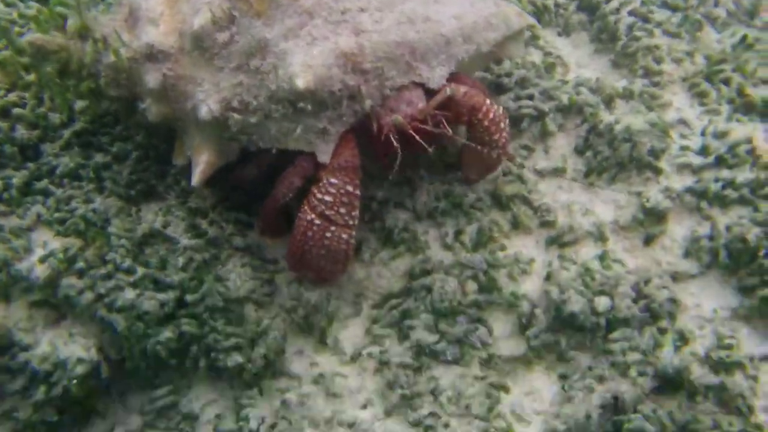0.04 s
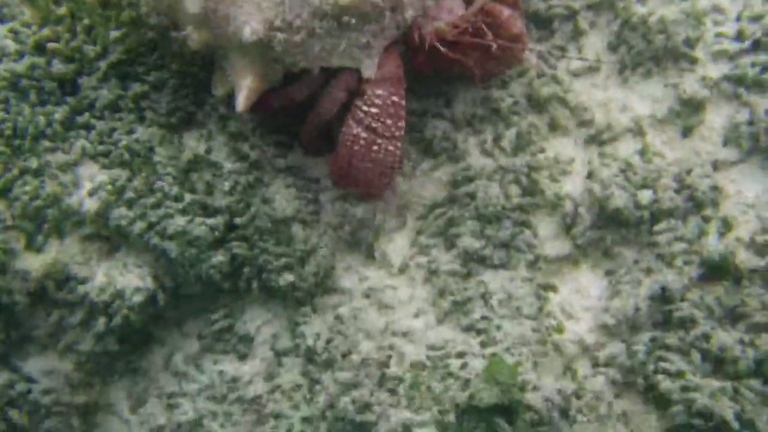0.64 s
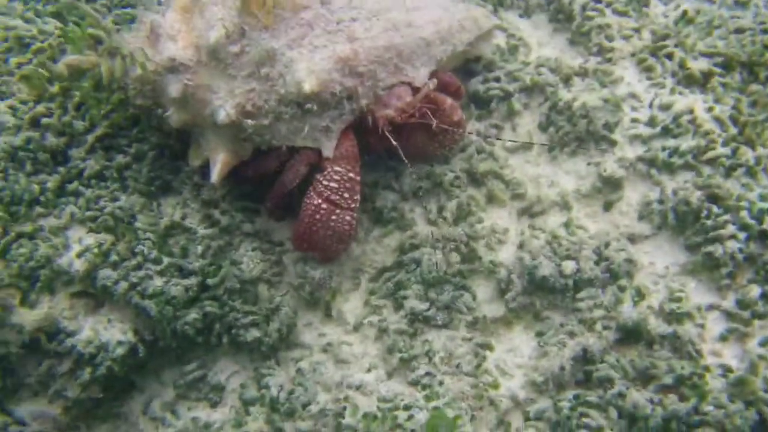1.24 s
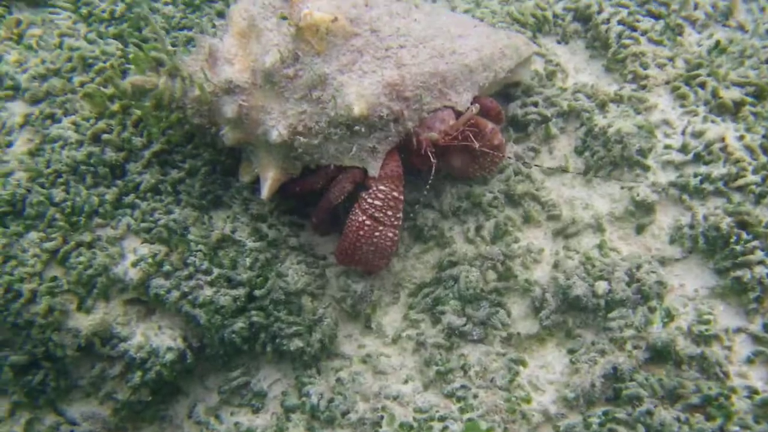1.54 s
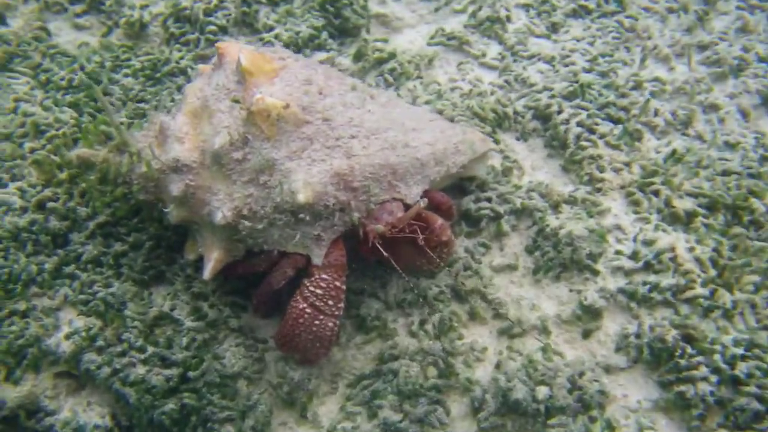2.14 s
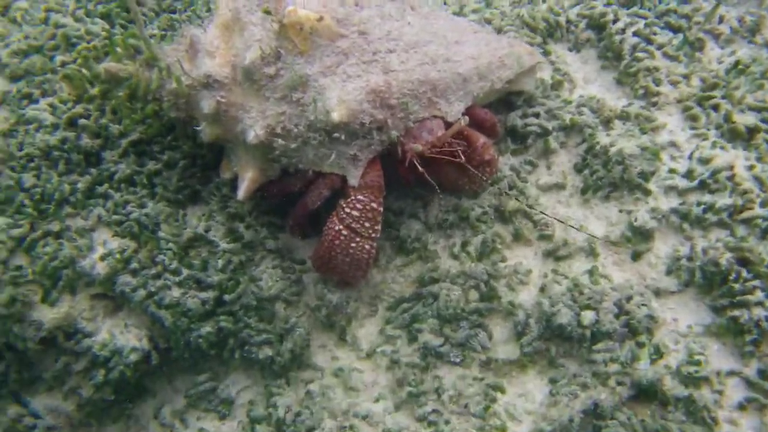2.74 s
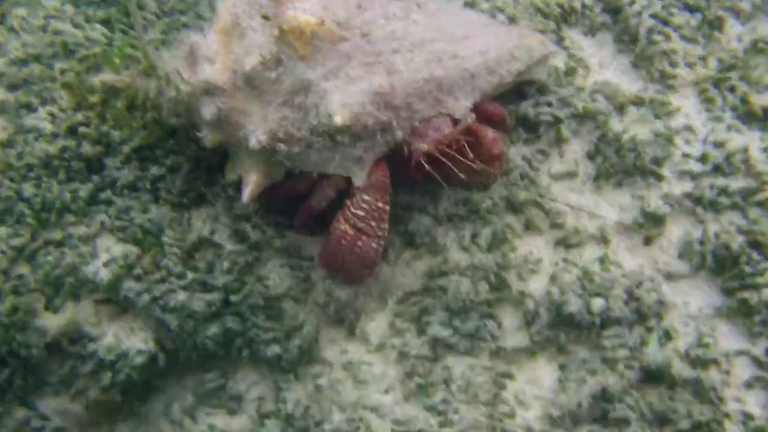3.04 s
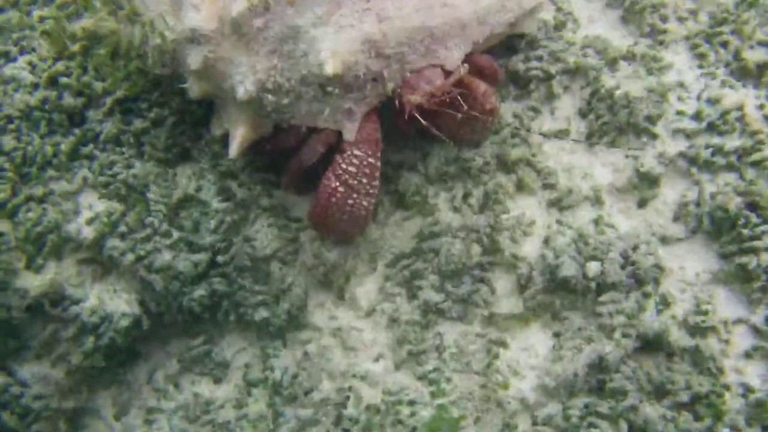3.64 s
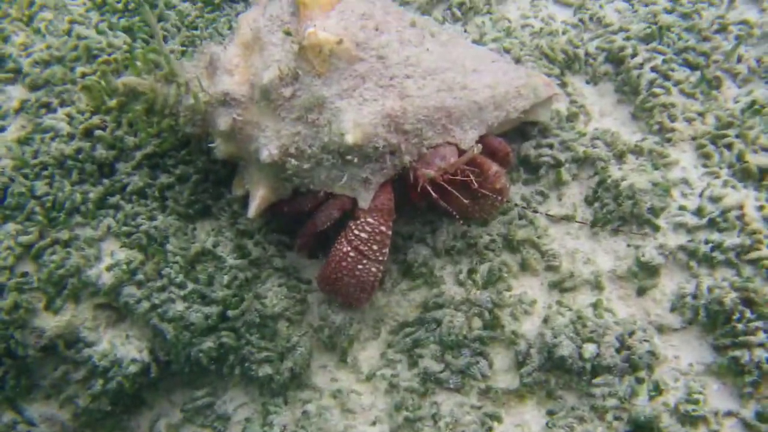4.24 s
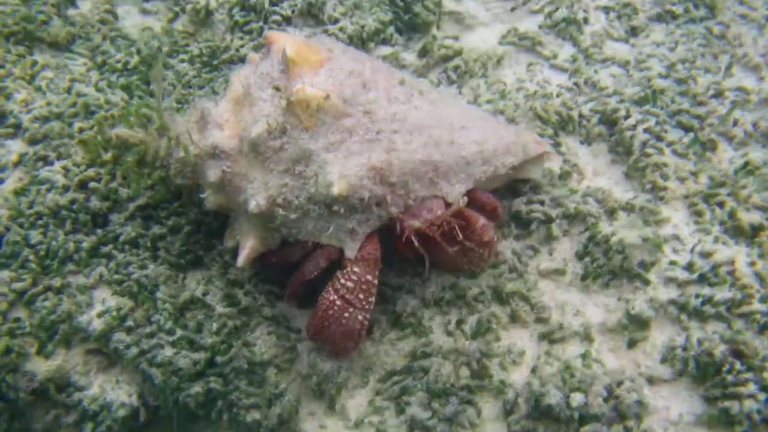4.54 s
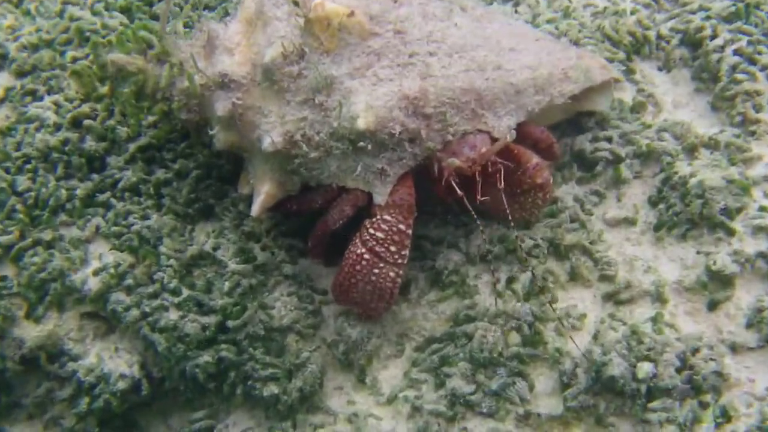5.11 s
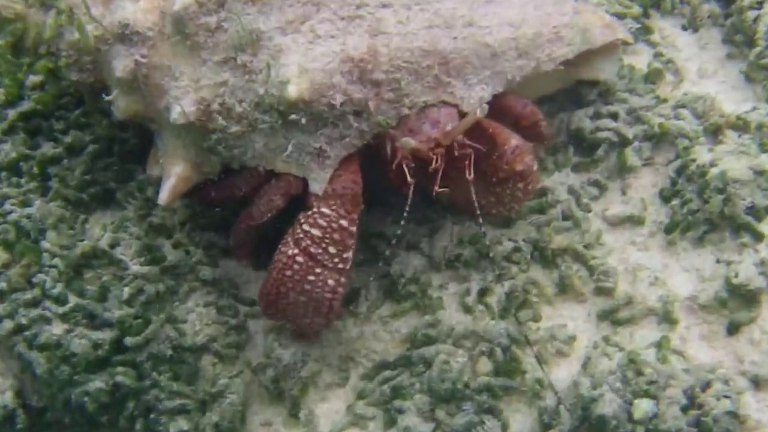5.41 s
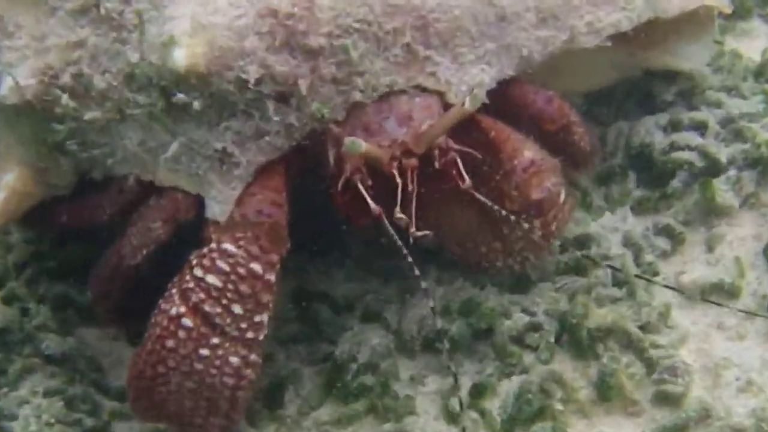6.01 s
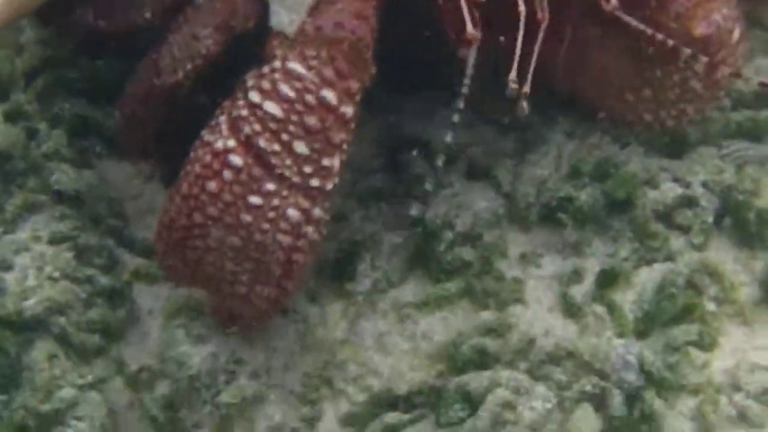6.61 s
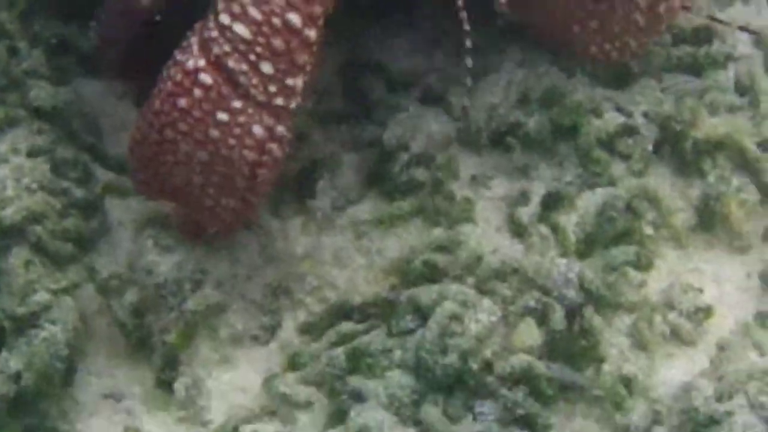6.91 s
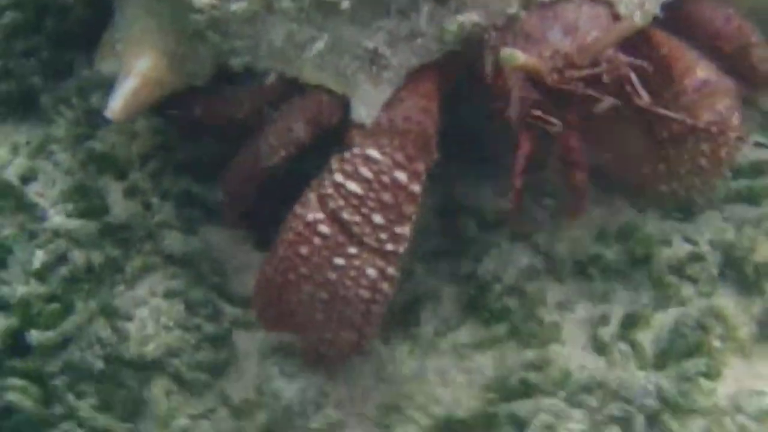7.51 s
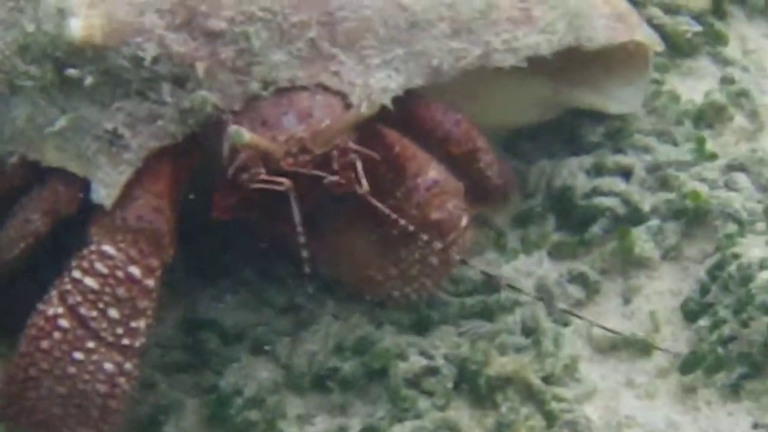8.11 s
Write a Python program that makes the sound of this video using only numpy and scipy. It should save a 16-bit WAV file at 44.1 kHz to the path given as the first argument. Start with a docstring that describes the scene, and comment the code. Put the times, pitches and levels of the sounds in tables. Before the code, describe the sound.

Close thuds, clicks and rubbing on a submerged camera housing, over low water rumble, bubbles and a faint crackle of snapping shrimp.

```python
"""Knocks, clicks and rubbing of a hand on a waterproof camera case, heard from the microphone inside it.
Blows thud and ring the case's cavity and walls; the skin sticks and slips on its shell.
The case is held close over a shallow seabed: water rumbles and washes round it, bubbles gurgle past,
and snapping shrimp crackle near and far over a faint hiss.
Each hard knock ducks the recorder's gain, which then creeps back."""
import sys
import numpy as np
from scipy import signal
from scipy.fft import rfft, irfft, next_fast_len
from scipy.io import wavfile

SR = 44100
rng = np.random.default_rng(int(sys.argv[2]) if len(sys.argv) > 2 else 0)


def transcribe(u):
    """Save the signal u as a 16-bit wav file named by the first command-line argument.

    u: samples, shape (n,) or (channels, n), limited to [-1, 1]; the rate is SR.
    q: integer samples, one column per channel.
    """
    v = np.clip(np.atleast_2d(u).T, -1, 1)
    q = np.round(v * 32767).astype(np.int16)
    wavfile.write(sys.argv[1], SR, q)


N = 368676
TIME = np.arange(N) / SR


def gain_of(db):
    return 10 ** (np.asarray(db) / 20)


def unit_rms(x):
    return x / np.sqrt(np.mean(x ** 2) + 1e-20)


def unit_burst(x):
    """x with the energy of 10 ms at level 1."""
    return x / np.linalg.norm(x) * np.sqrt(SR / 100)


def add(mix, start_s, sound):
    part = mix[max(round(start_s * SR), 0):][:len(sound)]
    part += sound[:len(part)]


def follow(curve):
    """Gain over time from rows of (time [s], level [dB])."""
    return gain_of(np.interp(TIME, *np.transpose(curve)))


def coloured(x, spectrum):
    """x filtered by the given spectrum, at unit level."""
    hz, db = np.transpose(spectrum)
    size = next_fast_len(N)
    shape_db = np.interp(np.log(np.fft.rfftfreq(size, 1 / SR) + 1), np.log(hz), db)
    return unit_rms(irfft(rfft(x, size) * gain_of(shape_db), size)[:N])


def drift(per_s):
    """A random wander of unit size that turns so many times a second."""
    knots = rng.standard_normal(N // 20)
    return unit_rms(np.interp(TIME * per_s, np.arange(len(knots)), knots))


def grains(per_s, spread_db):
    """A random train of impulses, most small and a few large."""
    where, size, side = rng.random((int(per_s * N / SR), 3)).T
    sizes = gain_of(spread_db * np.minimum(-np.log(1 - size), 5))
    return np.bincount((where * N).astype(int), sizes * np.sign(side - .5), N)


def scatter(sound, per_s, spread_db):
    """One sound repeated at random moments and strengths."""
    out, train = np.zeros(N), grains(per_s, spread_db)
    for at in np.flatnonzero(train):
        add(out, at / SR, train[at] * sound)
    return out


def ring(modes, t):
    """Decaying modes struck at t = 0."""
    return sum(gain_of(db - 60 * t / t60) * np.sin(2 * np.pi * hz * t) for hz, db, t60 in modes)


def press(start_s, length_s, build_share=0.26, release_share=0.4):
    """Gain over time of one push of the hand that builds, holds and lets go."""
    corners = start_s + length_s * np.array([0, build_share, 1 - release_share, 1])
    return np.interp(TIME, corners, [0, 1, 1, 0])


# noise floor at the microphone: (frequency [Hz], relative level [dB])
HISS_SPECTRUM = [(100, -1), (1500, 6.5), (3800, 1), (4500, 0), (5200, 3.5), (5900, 0.5), (6600, 2),
                 (7600, -1.5), (11500, -1), (14500, -1), (15600, -10.5), (16200, -25)]


def hiss(hiss_db=-57):
    """The steady noise of the microphone and of the far reef."""
    return gain_of(hiss_db) * coloured(rng.standard_normal(N), HISS_SPECTRUM)


def shrimp(count=14, snaps_per_s=48, faintest_db=-60, spread_db=3.5, tick_db=-11):
    """Distant shrimp all around, each ringing the case with a snap of its own colour."""
    out = np.zeros(N)
    for centre_hz in np.geomspace(2600, 6500, count):
        snap = click(centre_hz, octaves=.7)
        add(snap, 0, gain_of(tick_db) * tick())
        out += scatter(snap, snaps_per_s / count, spread_db)
    return gain_of(faintest_db) * out


# slow pressure of the water over the seabed: (time [s], relative level [dB])
RUMBLE_LEVELS = [(0, -43.5), (1.0, -33.5), (1.45, -39.5), (1.85, -32.5), (2.2, -47), (3.15, -27),
                 (4.15, -37.5), (4.8, -31), (6.2, -37), (7.3, -32.5), (8.36, -31)]
# its spectrum at the microphone: (frequency [Hz], relative level [dB])
RUMBLE_SPECTRUM = [(8, -21), (22, 6.5), (45, 0.5), (90, -3), (140, -8), (220, -13), (400, -30), (1000, -70)]


def rumble(rumble_db=-3):
    """Deep pressure swings of the moving water."""
    swings = coloured(rng.standard_normal(N), RUMBLE_SPECTRUM)
    return gain_of(rumble_db) * swings * follow(RUMBLE_LEVELS)


# current round the case, swelling every second or two: (time [s], relative level [dB])
CURRENT_LEVELS = [(0, -41.5), (0.35, -48.5), (1.6, -42), (2.15, -35), (2.92, -33), (3.2, -17.5),
                  (3.75, -25), (4.6, -34.5), (4.95, -27.5), (5.7, -26.5), (6.08, -52.5), (6.5, -25.5),
                  (7.2, -29), (7.65, -43.5), (8.0, -33.5), (8.36, -32.5)]
# shoves of the hand on the case: (start [s], length [s], rub [dB], judder [dB], slosh [dB])
SHOVES = [(0.476, 0.13, -38, -44.5, -29.5), (0.585, 0.28, -39, -40.5, -30), (0.735, 0.15, -32, -27, -23.5),
          (0.838, 0.17, -49, -50, -29), (0.967, 0.047, -26.5, -25, -40), (0.99, 0.1, -39, -42, -29.5),
          (1.261, 0.16, -38.5, -45, -36.5), (1.632, 0.078, -31.5, -34.5, -27.5),
          (1.692, 0.12, -32, -59, -39), (1.802, 0.11, -30, -26.5, -21.5), (1.866, 0.1, -37.5, -31.5, -32),
          (2.01, 0.18, -38.5, -39.5, -40), (2.192, 0.11, -39.5, -46, -41), (2.312, 0.22, -39, -39, -44),
          (2.481, 0.048, -42, -29, -30.5), (2.525, 0.29, -37, -38.5, -35.5),
          (2.951, 0.037, -29.5, -27.5, -43), (3.002, 0.17, -27, -27, -12.5), (3.162, 0.13, -25, -27.5, -22),
          (7.09, 0.11, -45, -52, -26), (7.457, 0.09, -43, -48, -35.5)]


def motion(rest_rub_db=-53.5, pull_rub_db=-21.5):
    """Gains over time of rubbing, judder and flow: the current and each shove add their power."""
    current = follow(CURRENT_LEVELS)
    # the hand rubs faintly at rest, and more as the current pulls on the case
    rub_power = gain_of(rest_rub_db) ** 2 + (gain_of(pull_rub_db) * current) ** 2
    judder_power, flow_power = np.zeros(N), current ** 2
    for start_s, length_s, rub_db, judder_db, slosh_db in SHOVES:
        power = press(start_s, length_s) ** 2
        rub_power += power * gain_of(rub_db) ** 2
        judder_power += power * gain_of(judder_db) ** 2
        flow_power += power * gain_of(slosh_db) ** 2
    return np.sqrt(rub_power), np.sqrt(judder_power), np.sqrt(flow_power)


# the wash, heard from inside the case: (frequency [Hz], relative level [dB])
WASH_SPECTRUM = [(60, -45.5), (150, -15), (210, -7.5), (265, -6.5), (305, -3.5), (350, 2), (420, -6.5),
                 (500, -13.5), (570, -20.5), (650, -11), (760, -34.5), (1000, -39.5), (1450, -45),
                 (1690, -31.5), (1950, -49.5), (2900, -62), (3190, -45), (3500, -65.5)]


def wash(flow, wash_db=-3, eddy_db=2):
    """Eddies drum on the case near its cavity note."""
    eddies = grains(per_s=1500, spread_db=3.06) * gain_of(eddy_db * drift(per_s=35))
    return gain_of(wash_db) * coloured(eddies, WASH_SPECTRUM) * flow


def burble(flow, count=14, low_hz=230, high_hz=680, per_s=40, cycles=9, glide=0.028, burble_db=-9):
    """Small bubbles carried in the wash, each a short rising note; the high ones are weaker."""
    out, t = np.zeros(N), np.arange(SR // 8) / SR
    for hz in np.geomspace(low_hz, high_hz, count):
        age = hz * t / cycles
        note = np.sin(2 * np.pi * hz * t * (1 + glide * age)) * age * np.exp(-2 * age)
        tilt_db = -9 * np.log2(hz / low_hz)
        out += scatter(gain_of(tilt_db) * note, per_s / count, spread_db=2.0)
    return gain_of(burble_db) * unit_rms(out) * flow


# large bubbles slipping past the case:
# (start [s], length [s], first pitch [Hz], last pitch [Hz], level [dB], swell [share of length])
LARGE_BUBBLES = [(2.297, 0.15, 276.4, 283, -28, 0.23), (2.422, 0.068, 290, 312, -25, .7),
                 (2.561, 0.059, 349, 380, -18, 0.32), (2.598, 0.093, 383, 350, -18, 0.28),
                 (3.031, 0.082, 328.6, 464, 4, 0.24), (3.036, 0.13, 205.4, 107, 6, 0.094),
                 (3.125, 0.055, 291, 209, -1, 0.63), (3.225, 0.065, 369, 283, -13.5, 0.47),
                 (5.81, 0.1, 343, 271, -28.5, 0.3), (5.921, 0.11, 643, 640, -42.5, 0.19),
                 (6.211, 0.048, 665, 616, -37.5, 0.37)]


def gurgles(wobble_db=1, jitter=0.051, glide_power=2.05, fade_power=1.66):
    """Each bubble swells and dies away as one wobbling tone whose glide gathers speed."""
    out, wobble = np.zeros(N), gain_of(wobble_db * drift(per_s=121.04))
    for start_s, length_s, first_hz, last_hz, db, swell in LARGE_BUBBLES:
        age = np.linspace(0, 1, int(length_s * SR))
        shape_change = np.interp(age, np.linspace(0, 1, 24), rng.standard_normal(24))
        hz = (first_hz + (last_hz - first_hz) * age ** glide_power) * (1 + jitter * shape_change)
        envelope = np.minimum(age / swell, ((1 - age) / (1 - swell)) ** fade_power)
        add(out, start_s, gain_of(db) * envelope * np.sin(2 * np.pi * np.cumsum(hz) / SR))
    return out * wobble


# the case shuddering round the microphone: (frequency [Hz], relative level [dB])
DRONE_SPECTRUM = [(40, -29), (70, -1.5), (95, -2), (120, -4), (160, -35), (400, -57.5)]


def drone(start_s=7.88, length_s=0.51, drone_db=-29):
    """A narrow, low shudder of the case as the hand tightens."""
    shudder = coloured(rng.standard_normal(N), DRONE_SPECTRUM)
    return gain_of(drone_db) * shudder * press(start_s, length_s)


# skin dragging on the case, heard from inside: (frequency [Hz], relative level [dB])
DRAG_SPECTRUM = [(40, -6.5), (110, -1), (220, -5), (360, 0.5), (480, -3), (680, 1), (950, -16),
                 (1300, -30.5), (4000, -57)]


def drags(judder):
    """Under pressure the skin sticks and slips slowly enough to judder the whole case."""
    return judder * coloured(grains(per_s=700, spread_db=0.84), DRAG_SPECTRUM)


# the grip rubbing right by the microphone: (frequency [Hz], relative level [dB])
RUB_SPECTRUM = [(200, -17), (500, 11), (800, 6.5), (1200, 1.5), (1700, 5), (2050, 3.5), (2450, -0.5),
                (2850, -6), (3250, -11.5), (4000, -20.5), (5200, -11), (6200, -36), (9000, -47.5),
                (16000, -44)]


def grip(rub, rub_db=-3, catch_db=2.0, grit_db=-14, grit_top_hz=3800):
    """Thousands of tiny slips a second, catching unevenly; coarser grit rings the shell's lower modes."""
    slips = grains(per_s=5000, spread_db=3.5) * gain_of(catch_db * drift(per_s=110))
    low_modes = [mode for mode in SHELL_MODES if mode[0] < grit_top_hz]
    shell = ring(low_modes, np.arange(2048) / SR)
    grit = signal.oaconvolve(grains(per_s=350, spread_db=1.5), shell)[:N]
    return (gain_of(rub_db) * coloured(slips, RUB_SPECTRUM) + gain_of(grit_db) * unit_rms(grit)) * rub


# the stiff shell round the microphone: (frequency [Hz], level [dB], time to fall 60 dB [s])
SHELL_MODES = [(1020, -3, 0.035), (1640, -4, 0.011), (1750, -1.5, 0.033), (2048, 1, 0.015),
               (2415, 4.5, 0.012), (3205, -0.5, 0.02), (3567, 3, 0.0077), (4330, -6, 0.011),
               (5120, 5, 0.0066), (5300, 6, 0.0048), (6560, 2, 0.0079), (7000, -19.5, 0.0069)]


def click(centre_hz, octaves, chatter=0.21, chatter_s=0.0017, direct=11, detune=0.037, uneven_db=2):
    """A snap and its brief chatter ring the shell; the contact picks which modes speak."""
    t = np.arange(2048) / SR
    force = chatter * rng.standard_normal(len(t)) * np.exp(-t / chatter_s)
    force[0] += 1
    # each spot on the shell rings a little differently
    modes = [(hz * (1 + detune * rng.standard_normal()), db + uneven_db * rng.standard_normal(), t60)
             for hz, db, t60 in SHELL_MODES]
    shell = ring(modes, t)
    shell[0] += direct
    hz = np.fft.rfftfreq(4096, 1 / SR) + 1
    log_gain = -np.log(1 + (np.log2(hz / centre_hz) / max(octaves, .2)) ** 2)
    mirrored = np.r_[log_gain, log_gain[-2:0:-1]]
    contact = np.exp(np.conj(signal.hilbert(mirrored)))[:len(hz)]  # minimum phase keeps the onset sharp
    return unit_burst(irfft(rfft(force, 4096) * rfft(shell, 4096) * contact)[:len(t)])


def tick(decay_s=0.0004, band_hz=(7600, 14000)):
    """The brightest edge of a click, too high to ring."""
    t = np.arange(512) / SR
    burst = rng.standard_normal(len(t)) * np.exp(-t / decay_s)
    return unit_burst(signal.lfilter(*signal.butter(2, band_hz, "band", fs=SR), burst))


# sharp clicks on and near the case:
# (time [s], level over 10 ms [dB], centre [Hz], spread [octaves], tick level [dB])
CLOSE_CLICKS = [(0.0957, -36.5, 6400, 0.19, -52), (0.1714, -44, 3700, 0.71, -68),
                (0.4108, -38.5, 4660, 0.18, -57), (0.4903, -34.5, 2820, 0.82, -71),
                (0.5485, -37, 2010, 0.43, -73), (0.9865, -26.5, 2210, 0.68, -66),
                (0.9933, -23, 2460, 0.74, -61), (1.024, -26, 1740, 0.59, -51),
                (1.4259, -43.5, 3530, 1.3, -60), (1.5647, -32, 4780, 1.14, -41),
                (1.9037, -17, 2220, 0.37, -39.5), (1.9608, -25, 2610, 0.42, -67),
                (2.2511, -36, 3300, 1, -58), (2.38, -30.5, 2210, 0.16, -69), (2.6753, -28, 2350, 0.38, -61),
                (2.8185, -22.5, 2790, 0.65, -58), (2.8525, -37, 2950, 1.9, -52),
                (3.045, -44, 5500, 1.8, -36.5), (3.4387, -27, 2370, 0.63, -57),
                (3.7645, -37, 1900, 0.28, -73), (3.8857, -22, 2400, 0.84, -66),
                (4.016, -14.5, 3050, 0.38, -71), (4.3216, -40.5, 5830, 0.42, -48.5),
                (4.4275, -36, 2020, 0.34, -70), (4.544, -40, 2330, 0.69, -63), (4.64, -37, 2930, 0.68, -52),
                (4.8698, -37.5, 3420, 0.68, -61), (5.2036, -32.5, 1680, 0.3, -67),
                (5.2374, -40, 2980, 0.53, -61.5), (5.4066, -44, 3830, 0.9, -49),
                (5.635, -24, 5640, 0.74, -48), (5.704, -12.5, 2770, 0.8, -32),
                (5.8853, -44.5, 5970, 0.22, -55), (5.911, -40.5, 1960, 0.26, -58.5),
                (6.16, -36, 2230, 1.4, -49), (6.267, -46.5, 4770, 0.31, -44),
                (6.5556, -42.5, 3320, 1.9, -61), (6.667, -36.5, 1754, 0.53, -66),
                (6.7311, -44, 4430, 0.73, -57), (6.8218, -26, 2640, 0.44, -61),
                (6.989, -39, 4000, 1.6, -44), (7.0285, -30, 1730, 0.93, -52),
                (7.3352, -40, 2060, 0.82, -69), (7.4317, -39.5, 5630, 0.32, -45),
                (7.4724, -29.5, 3140, 0.26, -70), (7.4938, -28.5, 2100, 0.65, -70),
                (7.5963, -40.5, 3200, 0.75, -44.5), (7.711, -42.5, 7000, 1.2, -41.5),
                (7.956, -28.5, 2260, 0.89, -68), (8.0455, -39.5, 4900, 0.42, -53)]


def clicks():
    """The nearest shrimp snaps and the creaks of the case, each with a bright tick on top."""
    out = np.zeros(N)
    for time_s, db, centre_hz, octaves, tick_db in CLOSE_CLICKS:
        add(out, time_s, gain_of(db) * click(centre_hz, octaves))
        add(out, time_s, gain_of(tick_db) * tick())
    return out


# the case's flat walls, damped by the water: (frequency [Hz], level [dB], time to fall 60 dB [s])
WALL_MODES = [(525, 3, 0.03), (765, -2, 0.02), (911, 1, 0.012), (1358, 2, 0.01), (1771, 3, 0.011),
              (2390, 3, 0.0033), (3320, 7.5, 0.0037), (5000, -16.5, 0.011)]


def crack(centre_hz, t, rise_cycles=0.65):
    """The walls answer a blow, the harder the contact the higher the modes. Peak 1."""
    sound = np.zeros(len(t))
    for k, mode in enumerate(WALL_MODES):
        octaves_off = np.log2(mode[0] / centre_hz)
        sound += (-1) ** k * ring([mode], t) / (1 + octaves_off ** 2)
    sound *= 1 - np.exp(-t * centre_hz / rise_cycles)
    return sound / abs(sound).max()


def thud(hz, t, decay_cycles=0.54, rise_s=0.00054):
    """A heavily damped swing of the whole case, cushioned by the water. Peak 1."""
    swing = np.sin(2 * np.pi * hz * t) * np.exp(-hz * t / decay_cycles) * (1 - np.exp(-t / rise_s))
    return swing / abs(swing).max()


# the air and back of the case: (frequency [Hz], level [dB], time to fall 60 dB [s])
CAVITY_MODES = [(363.6, 7.5, 0.05), (200, -6.5, 0.069), (451, -5.5, 0.054), (636, -7, 0.046),
                (1680, -55, .22), (3200, -60, .24)]
# blows on the case, right by the microphone:
# (time [s], thud level [dB], thud pitch [Hz], cavity gain [dB], crack level [dB], crack centre [Hz])
CASE_KNOCKS = [(1.1281, 6, 507, -6.5, 3, 870), (1.1893, -11.5, 405, -19, -20.5, 905),
               (1.2174, -48, 380, -28, -26.5, 1120), (2.8074, 4, 200, -19, -20, 800),
               (3.0111, -5, 260, -11.5, -39, 697), (3.0472, 2.5, 119, -16.5, -34, 700),
               (3.8429, -13, 247.4, -19, -25, 787), (4.3242, -5, 64.6, -16, -43, 700),
               (4.3332, -5, 177, -18, -26, 600), (4.4729, -15.5, 270, -12.5, -20.5, 785),
               (4.814, 1, 225, 10.5, 12.5, 2050), (6.338, 7, 255, 9.5, 8.5, 1240),
               (7.15, -15.5, 144, -21, -37.5, 900), (7.4734, -20, 330, -15.5, -22.5, 920),
               (7.4951, -21.5, 170, -28, -21.5, 1120), (7.642, 11, 221, -2.5, 7.5, 1340),
               (7.738, -2, 216, -18, -14.5, 1370), (7.808, -31.5, 260, -23.5, -49.5, 890),
               (7.8414, -6.5, 232, -21, -21, 1530)]


def knocks(build_s=0.0035):
    """A blow cracks, shoves the whole case, and leaves its cavity ringing."""
    out, t = np.zeros(N), np.arange(SR // 8) / SR
    cavity = ring(CAVITY_MODES, t) * (1 - np.exp(-t / build_s))
    for time_s, thud_db, thud_hz, cavity_db, crack_db, crack_hz in CASE_KNOCKS:
        add(out, time_s, gain_of(thud_db) * thud(thud_hz, t) + gain_of(cavity_db) * cavity)
        add(out, time_s, gain_of(crack_db) * crack(crack_hz, t[:1024]))
    return out


def scene():
    """One microphone: the hand on the case up close, the sea around it, and the hiss under both."""
    rub, judder, flow = motion()
    handling = grip(rub) + drags(judder) + drone() + clicks() + knocks()
    sea = rumble() + wash(flow) + burble(flow) + gurgles() + shrimp()
    return (handling + sea + hiss())[None]


def record(dry, limit_db=-3.5, recover_db_per_s=16, attack_s=0.0014, ceiling=0.72, top_hz=16400):
    """A limiter dives on loud peaks and recovers slowly; what outruns it saturates; the top is cut."""
    dry = signal.lfilter(*signal.butter(1, 15, "high", fs=SR), dry)
    over_db = np.maximum(20 * np.log10(abs(dry[0]) + 1e-9) - limit_db, 0)
    recovery_db = recover_db_per_s * TIME
    held_db = np.maximum.accumulate(over_db + recovery_db) - recovery_db
    lag = np.exp(-1 / (attack_s * SR))
    ducked = dry * gain_of(-signal.lfilter([1 - lag], [1, -lag], held_db))
    saturated = ducked / (1 + abs(ducked / ceiling) ** 4) ** .25
    lowpass = signal.firwin(511, top_hz, window=("kaiser", 9), fs=SR)
    return signal.oaconvolve(saturated, lowpass[None], "same")


dry = scene()
out = record(dry)
transcribe(out)
```